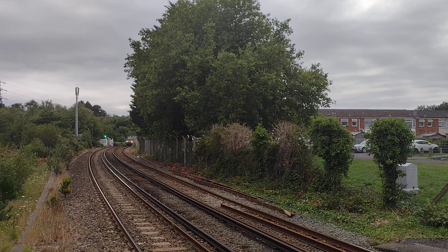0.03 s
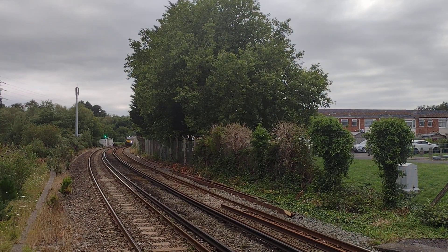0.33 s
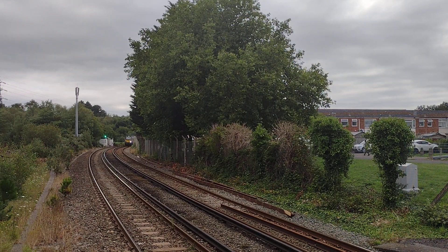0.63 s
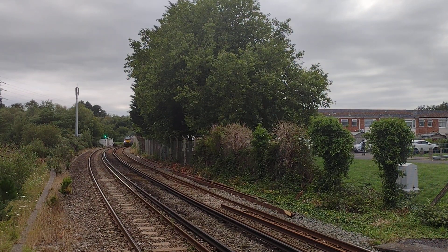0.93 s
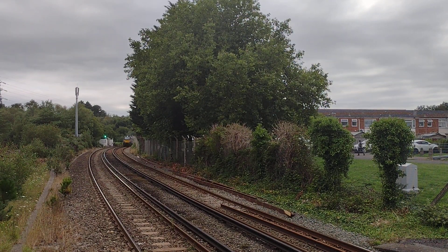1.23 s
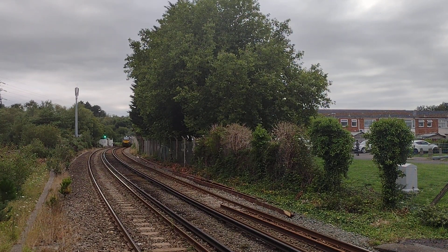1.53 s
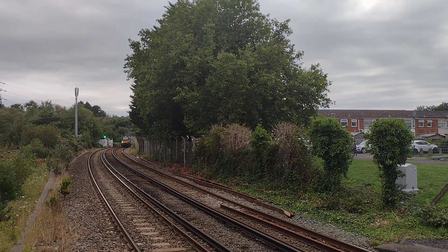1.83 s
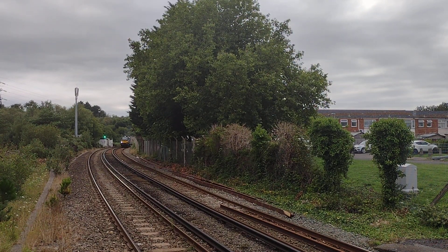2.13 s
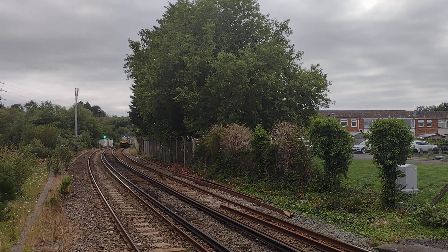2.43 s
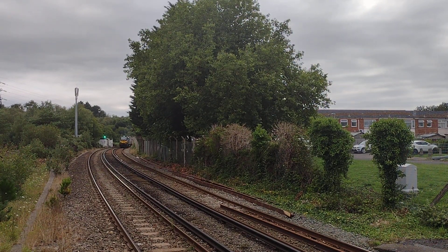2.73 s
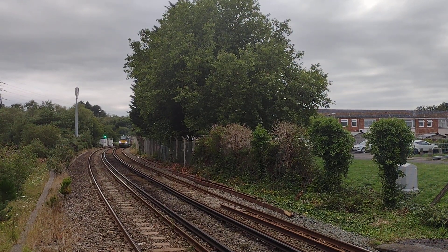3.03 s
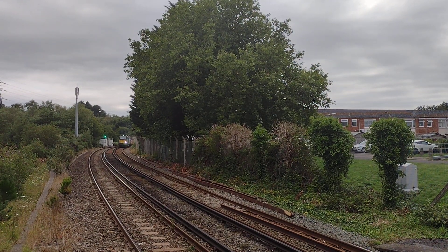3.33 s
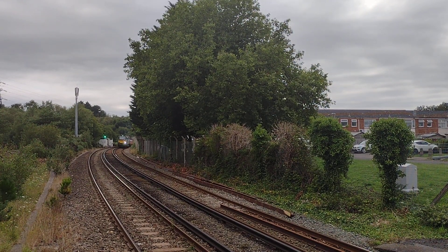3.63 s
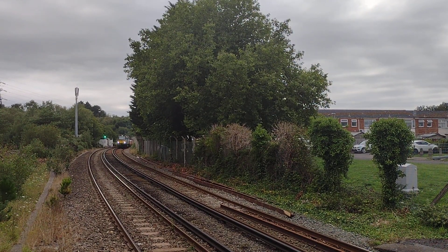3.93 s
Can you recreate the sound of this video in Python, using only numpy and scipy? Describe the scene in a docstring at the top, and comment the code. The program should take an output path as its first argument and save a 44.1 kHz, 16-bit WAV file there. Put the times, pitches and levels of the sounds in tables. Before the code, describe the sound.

Railway rails give a high, swelling hiss with a thin whistle and faint pings as a distant train approaches. Beside the track, stereo microphones also catch wind rumble, a throbbing engine, a few hollow knocks and one bird chirp.

```python
"""Beside a railway track, a stereo pair of microphones hears the rails sing ahead of a far-off train.
Its wheels drive the steel's high bands into a swelling hiss with a thin, beating whistle on top;
lower rail modes ping faintly. In the distance an engine's exhaust throbs over wind rumble and a soft
machine whine, with a few hollow knocks off to the right. A small bird chirps once among trees."""
import sys
import numpy as np
from scipy import signal
from scipy.fft import rfft, irfft
from scipy.io import wavfile

SR = 44100
rng = np.random.default_rng(int(sys.argv[2]) if len(sys.argv) > 2 else 0)


def pcm_store(signal):
    """Save signal as 16-bit PCM."""
    levels = np.round(np.clip(np.atleast_2d(signal), -1, 1) * 32767)
    wavfile.write(sys.argv[1], SR, levels.astype(np.int16).T)


N = 176400
TIME = np.arange(N) / SR
FREQ = np.fft.rfftfreq(N, 1 / SR)
RAIL_LAG_S = -5.3 / SR  # negative: the rails reach the left microphone first

# Force of the wheels on the rails. Each row: time in seconds, relative level of the hiss in dB.
WHEEL_FORCE = [(0.0, -75), (0.04, -80), (0.19, -60), (0.58, -63.5), (1.6, -56.5), (1.66, -63),
               (1.71, -52.5), (1.86, -51.5), (1.9, -55.5), (2.17, -49.5), (2.8, -52.5), (2.84, -44.5),
               (2.91, -50.5), (2.95, -46), (3.02, -51.5), (3.06, -45), (3.36, -52), (3.43, -47),
               (3.53, -51), (3.84, -45.5), (3.97, -39.5), (4.0, -39)]


def amp(db):
    """Decibels to gain."""
    return 10 ** (np.asarray(db) / 20)


def unit(x):
    """Scales to an rms of one."""
    return x / np.sqrt(np.mean(abs(x) ** 2) + 1e-30)


def curve(points):
    """A control curve over time."""
    return np.interp(TIME, *np.transpose(points))


def shape(points):
    """A spectrum, joined on a log-frequency axis."""
    hz, value = np.transpose(points)
    return np.interp(np.log(FREQ + 1), np.log(np.sort(hz)), value)


def peak(hz, width_hz):
    """Gain of a steep-sided resonance of unit power."""
    return unit(1 / (1 + ((FREQ - hz) / (.6 * width_hz)) ** 2))


def drift(rate_hz):
    """Random movement of unit size, mostly slower than rate_hz."""
    spectrum = rfft(rng.standard_normal(N)) * (FREQ > 0)
    return unit(irfft(spectrum / (1 + (FREQ / rate_hz) ** 4), N))


def noise(gain, likeness, lead=0):
    """Coloured noise of unit rms at two microphones, partly alike, the left ahead by lead radians."""
    common, separate = rfft(rng.standard_normal((2, N)))
    left = common * np.exp(1j * lead)
    right = likeness * common + np.sqrt(1 - likeness ** 2) * separate
    return unit(irfft(np.array([left, right]) * gain, N))


def wind_and_roar(level_db=-44, split_hz=200, growth_db_per_s=1, swell_db=0.8, swell_hz=5):
    """Low wind rumble, and a far roar that slowly grows."""
    # Colour of the open air. Each row: frequency in Hz, relative level in dB.
    colour = [(10, -1), (30, 0.5), (55, 1.5), (100, -4), (150, -13.5), (210, -19), (400, -24.5), (650, -21),
              (880, -20), (1100, -26), (1800, -25), (2200, -30.5), (3200, -33.5), (4400, -38),
              (6000, -39.5), (9000, -37.5), (15000, -36.5)]
    # How alike the two microphones hear it. Each row: frequency in Hz, likeness from 0 to 1.
    likeness = [(20, 0.35), (70, 0.57), (150, 0.76), (300, 0.87), (620, 0.55), (800, 0), (1150, 0),
                (1700, 0.52), (2200, 0.5), (2750, 0.32), (3200, 0.78), (4400, 0.89), (5600, 0.21),
                (8000, 0.1)]
    # How far the left microphone leads. Each row: frequency in Hz, phase in radians.
    lead = [(650, 0), (850, -1), (1200, 1.3), (1800, 1.4), (2300, 1), (3000, 3), (4600, 3.15), (5800, 4.2),
            (8000, 6.2)]
    air = noise(amp(shape(colour)), shape(likeness), shape(lead))
    rumble = irfft(rfft(air) / (1 + (FREQ / split_hz) ** 4), N)
    roar = (air - rumble) * amp(growth_db_per_s * (TIME - TIME.mean()) + swell_db * drift(swell_hz))
    return amp(level_db) * (rumble + roar)


def engine(gain_db=-0.32, waver_db=1.34, waver_hz=1.8, smear_turns=.202, throb_depth=.16):
    """A distant exhaust: its harmonics blend into a throbbing drone."""
    # Engine speed. Each row: time in seconds, cycles per second.
    cycle_hz = [(0, 7.6), (.5, 8.13), (1, 8.55), (1.25, 8.69), (1.5, 8.78), (2, 8.8), (2.5, 8.66),
                (3, 8.49), (3.5, 8.36), (4, 8.27)]
    # Exhaust harmonics. Each row: multiple of the cycle, then four relative levels in dB, evenly
    # spaced from start to end.
    harmonics = [(5, -49.5, -51, -53, -53), (6, -60, -60, -57, -61), (7, -43.5, -48, -52, -49),
                 (8, -41, -42, -46, -48), (9, -43.5, -43, -48.5, -41.5), (11, -40.5, -43.5, -43, -35.5),
                 (12, -53, -54, -53.5, -52.5), (13, -57, -56.5, -55, -56), (14, -70, -63, -61, -68),
                 (15, -52.5, -51, -56, -55), (16, -59, -64, -73, -77), (17, -61, -70, -73, -75),
                 (20, -62, -66, -74, -65)]
    turns = np.cumsum(curve(cycle_hz)) / SR + .83  # starts partway through a cycle
    drone = np.zeros(N)
    for order, *levels in harmonics:
        db = np.interp(TIME, np.linspace(0, TIME[-1], len(levels)), levels) + waver_db * drift(waver_hz)
        smear = smear_turns * order ** 2  # distance and ground draw each pulse out into a sweep
        drone += amp(db) * np.sqrt(2) * np.cos(2 * np.pi * (order * turns - smear))
    throb = 1 + throb_depth * np.cos(2 * np.pi * (turns - .45))  # one strong cylinder, near mid-cycle
    return drone * amp(gain_db) * throb


def machine_whine(pitch_hz=304.7, width_hz=7):
    """Far machinery holds one soft, wavering note."""
    # The note's harmonics. Each row: multiple of the pitch, level in dB.
    harmonics = [(1, -72.5), (2, -74), (3, -70.5), (4, -75)]
    return sum(amp(db) * noise(peak(order * pitch_hz, width_hz), likeness=0.93)
               for order, db in harmonics)


def rail_noise(gain):
    """Noise radiated by the rails, reaching the left microphone first."""
    return noise(gain, likeness=0.32, lead=-2 * np.pi * FREQ * RAIL_LAG_S)


def rail_hiss(main_db=5, low_db=1.03, top_db=.5, burst_db=0.9, burst_hz=14,
              flutter_db=0.76, flutter_hz=22):
    """Rough wheels excite the rail's three wave bands; the lowest comes in bursts."""
    # Colours of the three bands. Each row: frequency in Hz, relative level in dB.
    main_colour = [(3000, -25.5), (6300, -26), (8400, -14.5), (9100, -7), (9900, 2), (10700, 9),
                   (12200, 10), (13200, 5.5), (14500, 3.5), (15700, 13), (16000, -47)]
    low_colour = [(4000, -39.5), (6350, -60), (6560, 5), (6800, 0.5), (7100, -4.5), (7400, -10), (7750, -5),
                  (8200, -44), (9500, -16.5)]
    top_colour = [(14000, -40), (14550, -15), (14720, -5), (14900, -1), (15020, 5), (15110, -6),
                  (15350, -8), (15500, -12), (15700, -9), (15850, -33)]
    # Swell of the bands near 7 and 15 kHz. Each row: time in seconds, relative level in dB.
    low_swell = [(0.0, -71), (0.04, -77), (0.3, -59.5), (0.38, -72), (0.41, -59), (0.66, -69),
                 (0.76, -61.5), (1.09, -63), (1.12, -55.5), (1.28, -64), (1.66, -66), (1.72, -59),
                 (2.05, -59.5), (2.28, -55), (2.42, -62), (2.49, -55), (2.74, -62), (2.83, -52.5),
                 (3.54, -60.5), (3.95, -54), (4.0, -55)]
    top_swell = [(0, -50), (.7, -48.5), (1.1, -58), (1.9, -50), (2.3, -67), (2.9, -60), (3.5, -42),
                 (4, -49)]
    main = rail_noise(amp(shape(main_colour))) * amp(curve(WHEEL_FORCE) + main_db)
    low = rail_noise(amp(shape(low_colour))) * amp(curve(low_swell) + low_db)
    low *= amp(burst_db * drift(burst_hz))
    top = rail_noise(amp(shape(top_colour))) * amp(curve(top_swell) + top_db)
    return (main + low + top) * amp(flutter_db * drift(flutter_hz))


def trackside_echoes(sound, count=24, echo_db=-4, longest_s=.014):
    """Ballast and fence reflect the sound along short paths, different for each microphone."""
    delays = (longest_s * rng.random((2, count)) * SR).astype(int)
    gains = rng.choice([-1., 1.], (2, count)) * amp(echo_db) / np.sqrt(count)
    paths = np.zeros((2, SR // 8))
    for side in (0, 1):
        np.add.at(paths[side], delays[side], gains[side])
    paths[:, 0] += 1  # the direct path
    paths /= np.linalg.norm(paths, axis=1, keepdims=True)
    return signal.oaconvolve(sound, paths, axes=1)[:, :N]


def rail_ringing(gain_db=4, flare_db=3, flare_hz=3):
    """Narrow resonances flare up at random and make the hiss metallic."""
    # Resonances within the hiss. Each row: frequency in Hz, width in Hz, relative level in dB,
    # share of the wheels' swell that it follows.
    modes = [(10642, 16, -14, .65), (10660, 220, -17, .6), (10831, 30, -19, .9), (11353, 20, -15, 1),
             (11590, 30, -19, .65), (11780, 340, -11, .45), (12073, 40, -19, .6), (12291, 45, -16, .9),
             (12767, 16, -20, .8), (13029, 25, -23, .65), (13210, 25, -23, .65), (13708, 25, -23, .65)]
    force_db = curve(WHEEL_FORCE)
    swell_db = force_db - force_db.mean()
    ringing = np.zeros((2, N))
    for hz, width_hz, db, share in modes:
        mode = unit(rail_noise(peak(hz, width_hz)) * amp(flare_db * drift(flare_hz)))
        ringing += amp(db + share * swell_db) * mode
    return amp(force_db.mean() + gain_db) * ringing


def rail_tone(hz, wander_hz=4, wander_rate_hz=4, waver_db=1.5, waver_hz=4, flutter_db=1, flutter_hz=30):
    """One ringing mode of the rail, fluttering, and wavering differently at each microphone."""
    turns = np.cumsum(hz + wander_hz * drift(wander_rate_hz)) / SR
    pair = [unit(np.sin(2 * np.pi * (turns - hz * lag)) * amp(waver_db * drift(waver_hz)))
            for lag in (RAIL_LAG_S, 0)]
    return np.array(pair) * amp(flutter_db * drift(flutter_hz))


def rail_whistle(lone_hz=14839):
    """The highest modes ring on and beat against each other, with a lone mode just below them."""
    # A cluster of close, barely damped modes. Each row: frequency in Hz, relative level in dB.
    modes = [(14905, -15), (14987, -9), (15014.5, -2), (15029, -10), (15043.5, -5)]
    # Swell of the cluster and of the lone mode. Each row: time in seconds, relative level in dB.
    cluster_swell = [(0, -49), (.08, -67), (.36, -50), (.6, -57), (.78, -54), (.93, -42.5), (1.08, -40.5),
                     (1.25, -43.5), (1.47, -42.5), (1.9, -45.5), (2.3, -44.5), (2.68, -43.5), (2.73, -38),
                     (2.77, -48), (2.81, -37), (2.86, -42), (3.14, -39.5), (3.33, -48), (3.52, -50),
                     (3.85, -54), (4, -50)]
    lone_swell = [(0, -54), (.12, -57), (.38, -51), (.78, -59), (1.2, -55), (1.8, -49.5), (2.25, -51),
                  (2.6, -50), (3, -54), (3.58, -48.5), (3.85, -54), (4, -49)]
    cluster = sum(amp(db) * rail_tone(hz) for hz, db in modes)
    return cluster * amp(curve(cluster_swell)) + rail_tone(lone_hz) * amp(curve(lone_swell))


def blip(peak_s, hz, db, rise_s, fall_s, rough_hz, lead=0, left_db=0):
    """A brief, rough tone that swells and dies; lead (radians) and left_db offset the left microphone."""
    envelope = np.exp(-((TIME - peak_s) / np.where(TIME < peak_s, rise_s, fall_s)) ** 2)
    turns = np.cumsum(hz + rough_hz * drift(rough_hz)) / SR
    return amp([[db + left_db], [db]]) * envelope * np.sin(2 * np.pi * turns + np.array([[lead], [0]]))


def rail_pings(flutter_db=2, flutter_hz=10, growth_db_per_s=1.4, ping_db=2.5, lead=0.43):
    """The lower rail modes murmur, slowly growing, joined by a faint high overtone of the far machine whine;
    now and then a rail mode flares into a faint ping."""
    # The murmuring modes; the last row is a high overtone (twelfth harmonic) of the machine whine. Each row:
    # frequency in Hz, width in Hz, relative level in dB.
    modes = [(1800, 90, -70.5), (1942, 50, -68), (2780, 40, -80), (3655, 35, -82.5)]
    # The pings. Each row: time of the peak in seconds, pitch in Hz, relative level in dB.
    flares = [(.53, 1930, -62), (.935, 1950, -56.5), (1.015, 1950, -59), (1.18, 1945, -53),
              (1.755, 1960, -56), (1.89, 1950, -58), (2.3, 1955, -53.5), (2.4, 1950, -60),
              (2.535, 1950, -55), (2.865, 1950, -58), (2.94, 1930, -56), (3.035, 1960, -58),
              (3.14, 1950, -58), (3.49, 1945, -60), (3.985, 1940, -57)]
    murmur = sum(noise(peak(hz, width_hz), likeness=0.63, lead=lead)
                 * amp(db + flutter_db * drift(flutter_hz)) for hz, width_hz, db in modes)
    pings = sum(blip(s, hz, db + ping_db, rise_s=.018, fall_s=.018, rough_hz=17.5, lead=lead, left_db=-5)
                for s, hz, db in flares)
    return murmur * amp(growth_db_per_s * (TIME - TIME.mean())) + pings


def knocks():
    """Short, hollow knocks far off to the right, and one duller thud straight ahead."""
    # The knocks. Each row: time of the peak in seconds, pitch in Hz, level on the right in dB.
    strikes = [(.57, 860, -52), (.798, 820, -47), (1.705, 870, -53), (2.095, 870, -54), (2.848, 870, -47.5),
               (3.228, 865, -47), (3.32, 840, -55)]
    # The thud: time in seconds, pitch in Hz, level in dB, rise and fall in seconds, pitch scatter in Hz.
    thud = (2.7, 520, -52.5, .02, .04, 110)
    hollow = sum(blip(s, hz, db, rise_s=.01, fall_s=.016, rough_hz=55, lead=-1.7, left_db=-4)
                 for s, hz, db in strikes)
    return hollow + blip(*thud)


def bird(gain_db=-4.0, echo_db=5, echo_decay_s=0.019):
    """One gliding chirp, scattered by the trees on its way to the microphones."""
    # The chirp's glide. Each row: time in seconds, pitch in Hz, relative level in dB.
    glide = [(.755, 6440, -69), (0.764, 6080, -54), (.775, 6300, -61), (0.787, 6530, -54),
             (.797, 5970, -66), (.806, 5570, -69), (0.816, 5900, -56), (0.826, 6200, -63),
             (.845, 5860, -75)]
    s, hz, db = np.transpose(glide)
    turns = np.cumsum(np.interp(TIME, s, hz)) / SR
    call = np.sin(2 * np.pi * turns) * amp(np.interp(TIME, s, db, left=-200, right=-200) + gain_db)
    leaves = rng.standard_normal((2, SR // 4)) * np.exp(-TIME[:SR // 4] / echo_decay_s)
    echo = signal.fftconvolve(call[None], leaves / np.linalg.norm(leaves[0]), axes=1)[:, :N]
    return call + amp(echo_db) * echo


def scene(rail_left_db=-0.5):
    """Singing rails close to the microphones, in front of the distant sounds."""
    rails = trackside_echoes(rail_hiss()) + rail_ringing() + rail_whistle() + rail_pings()
    rails *= amp([[rail_left_db], [0]])
    return rails + engine() + knocks() + machine_whine() + wind_and_roar() + bird()


def record(dry, edge_hz=15780):
    """The recorder's band limit: a steep low-pass on both microphones."""
    lowpass = signal.firwin(1023, edge_hz, window=("kaiser", 9), fs=SR)
    return signal.oaconvolve(dry, lowpass[None], "same")


dry = scene()
out = record(dry)
pcm_store(out)
```